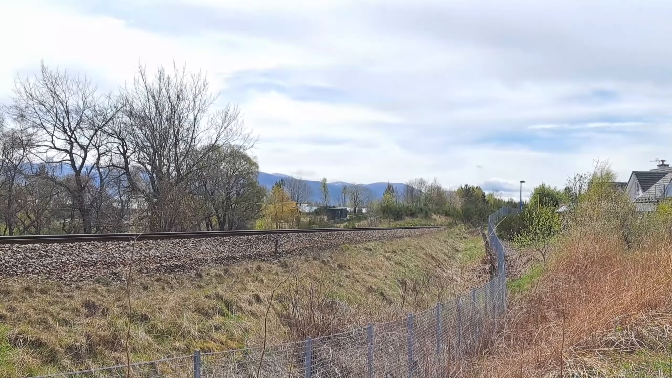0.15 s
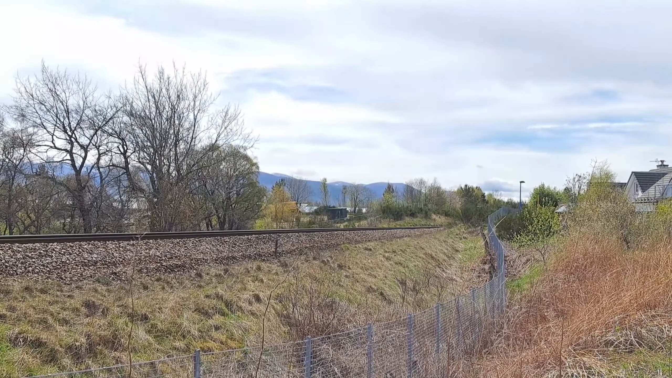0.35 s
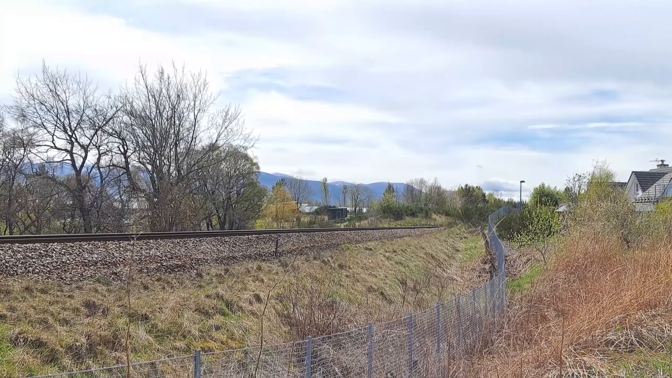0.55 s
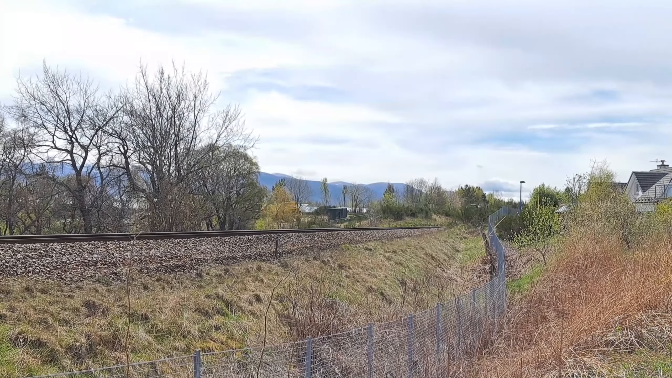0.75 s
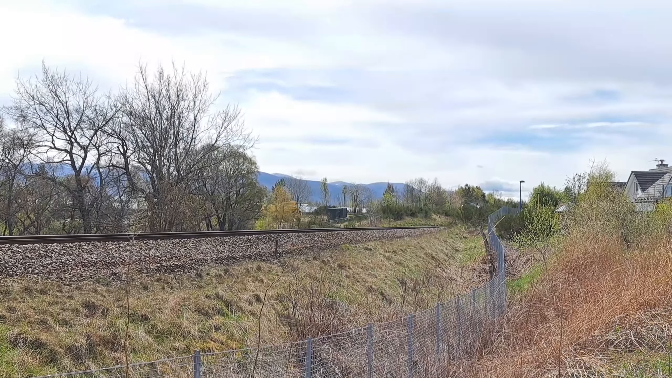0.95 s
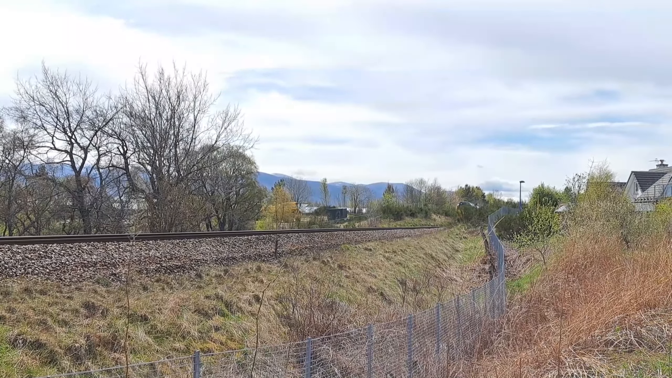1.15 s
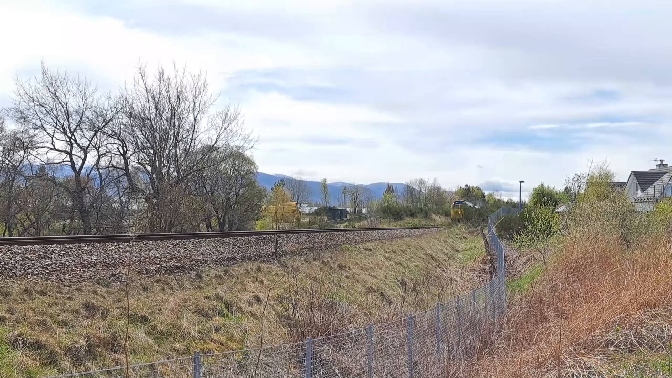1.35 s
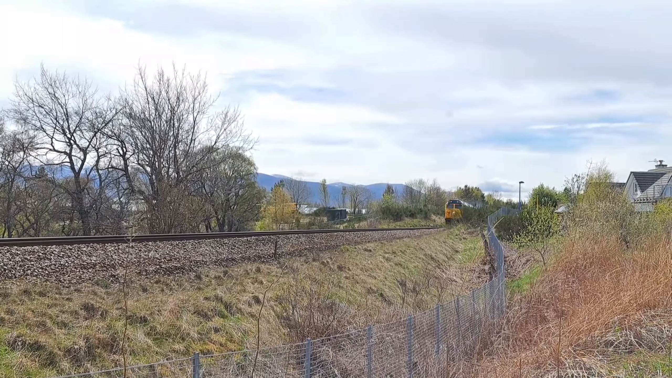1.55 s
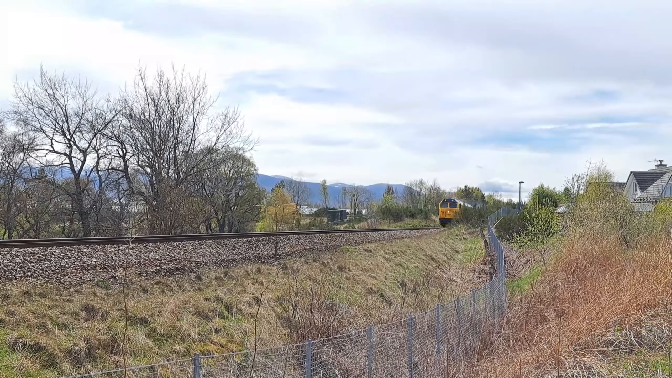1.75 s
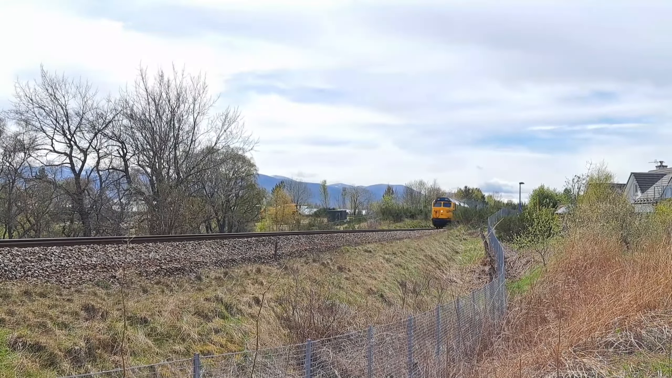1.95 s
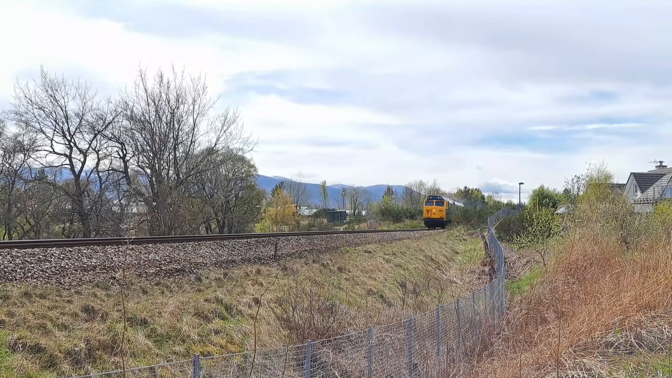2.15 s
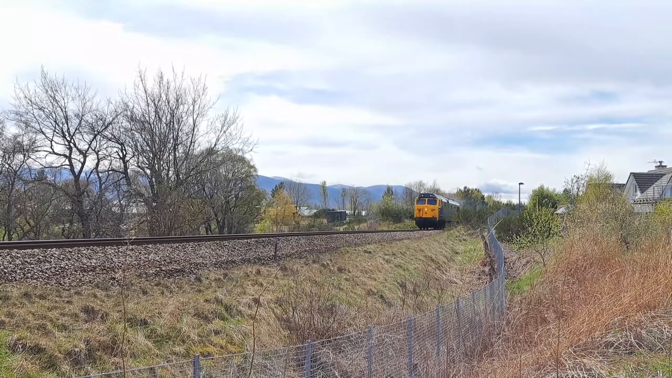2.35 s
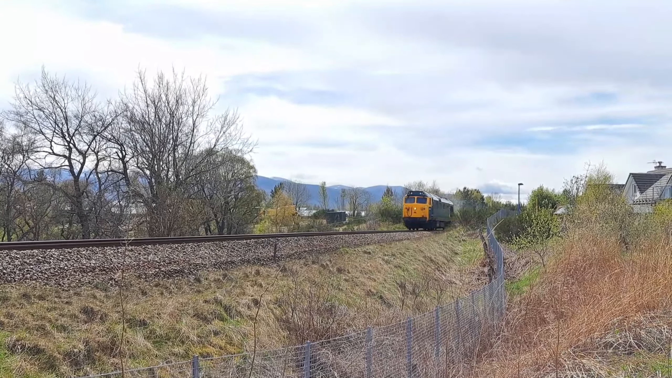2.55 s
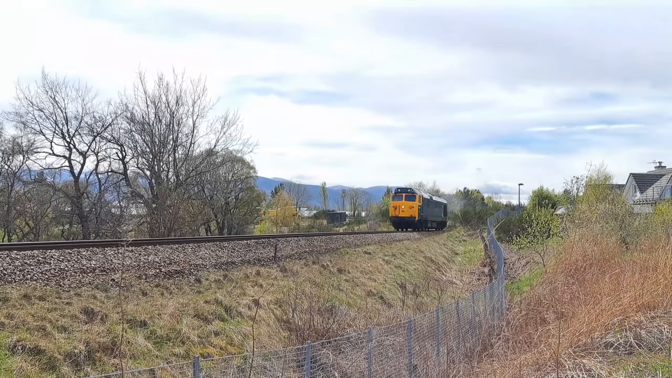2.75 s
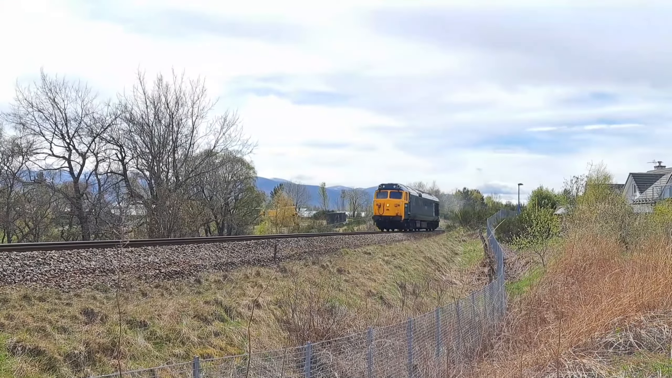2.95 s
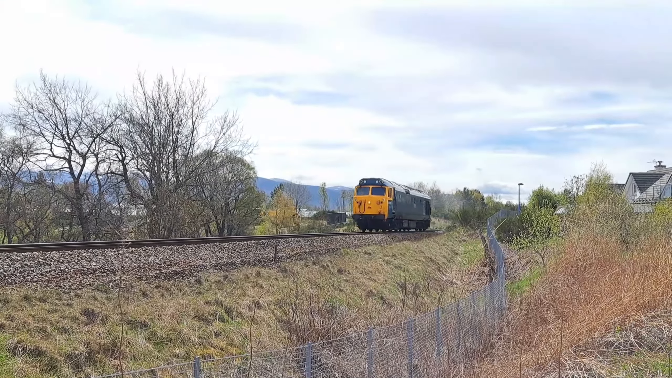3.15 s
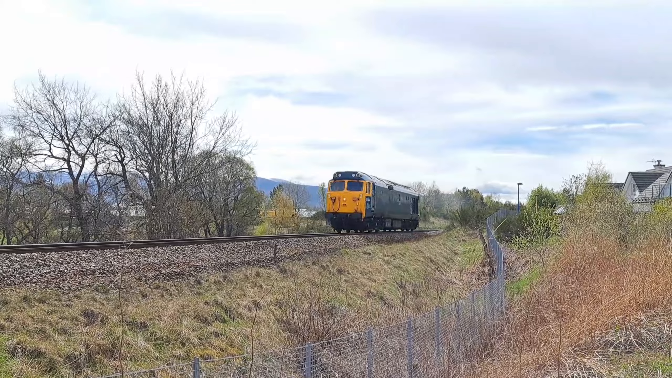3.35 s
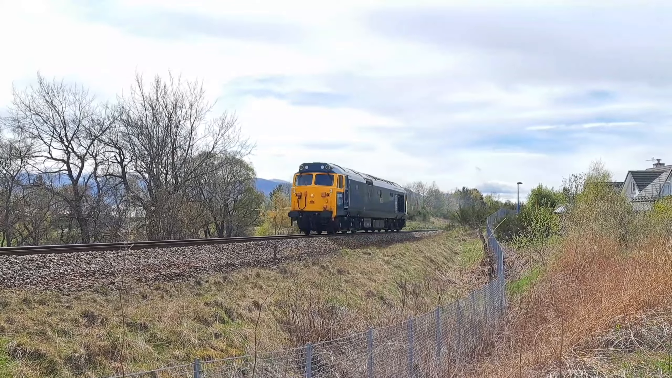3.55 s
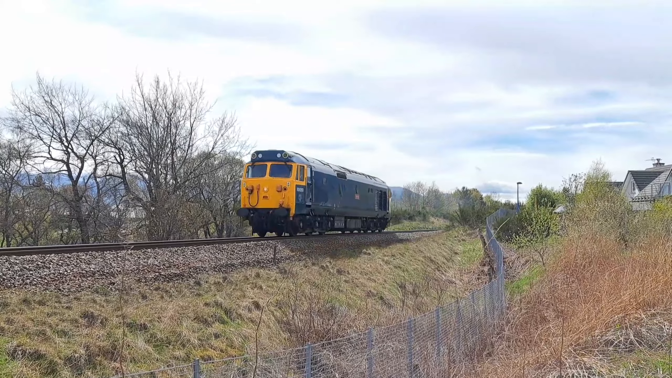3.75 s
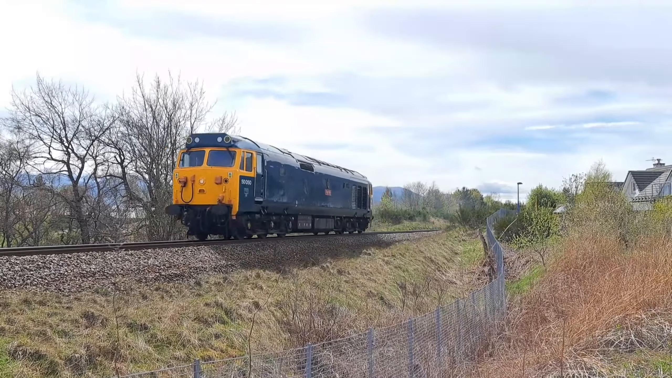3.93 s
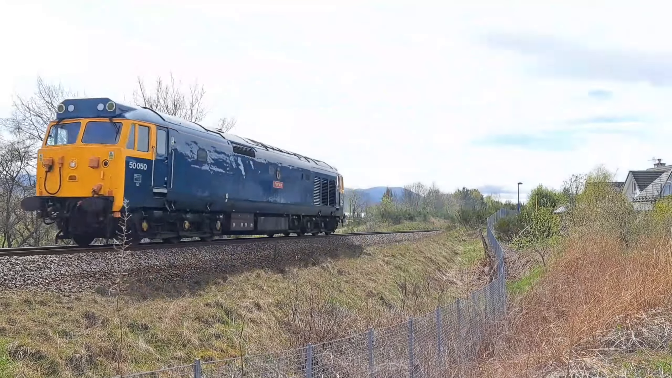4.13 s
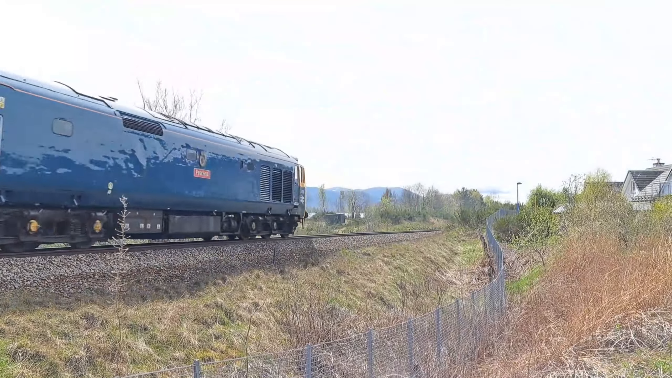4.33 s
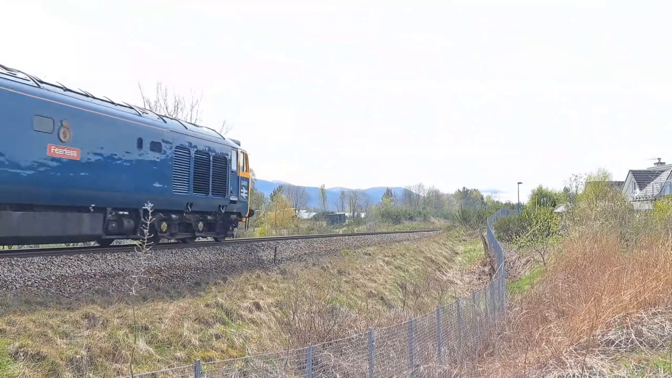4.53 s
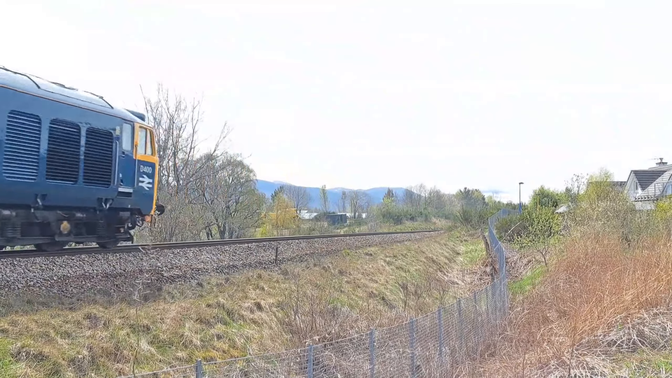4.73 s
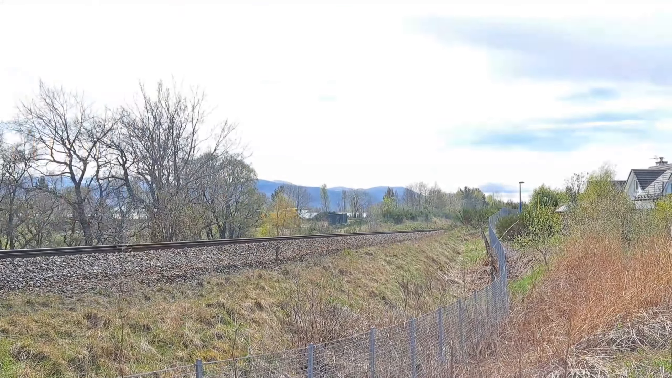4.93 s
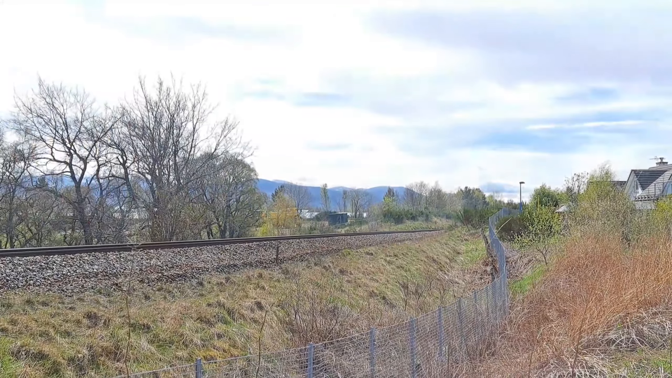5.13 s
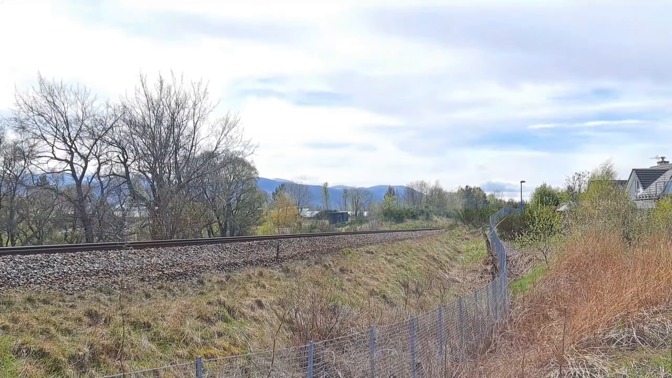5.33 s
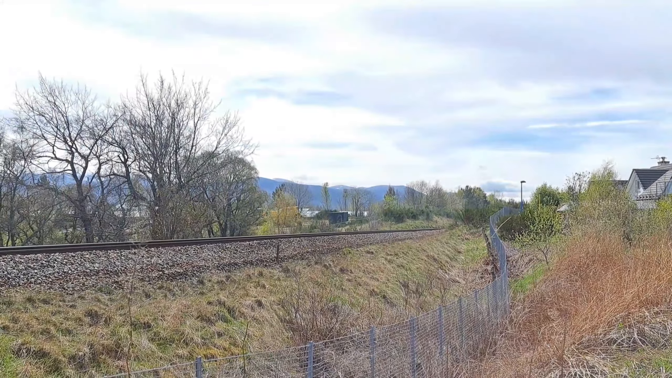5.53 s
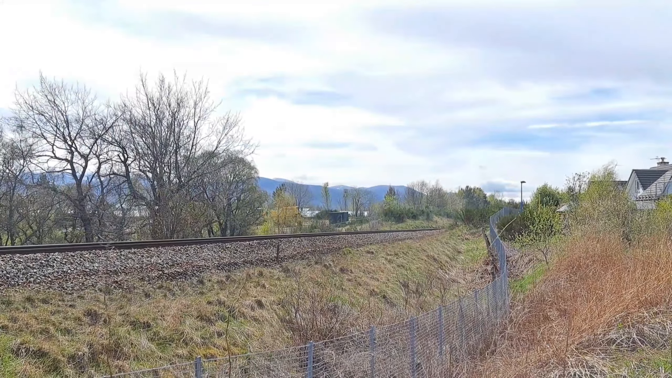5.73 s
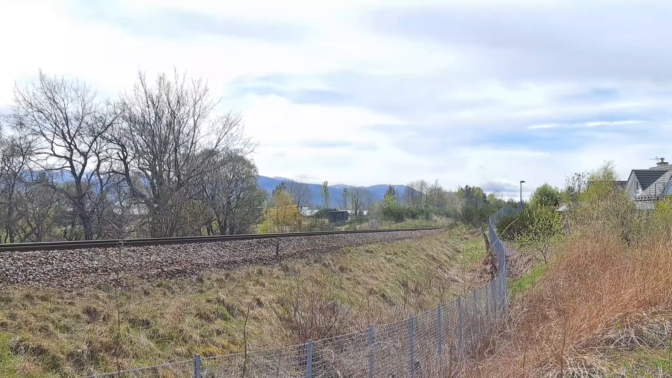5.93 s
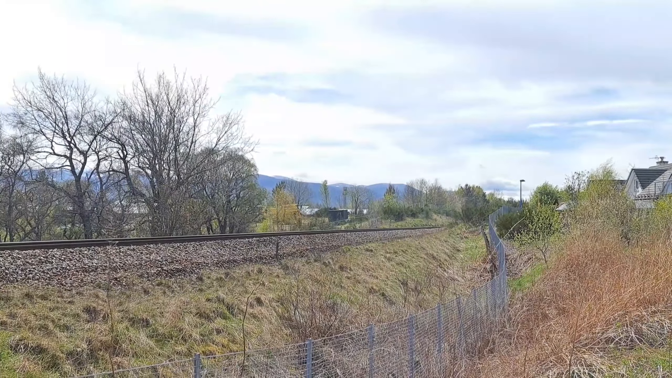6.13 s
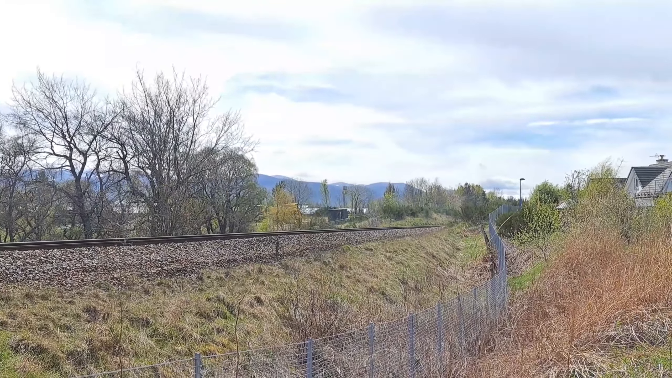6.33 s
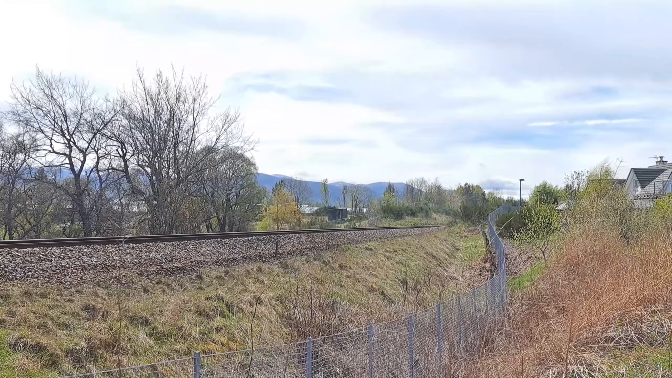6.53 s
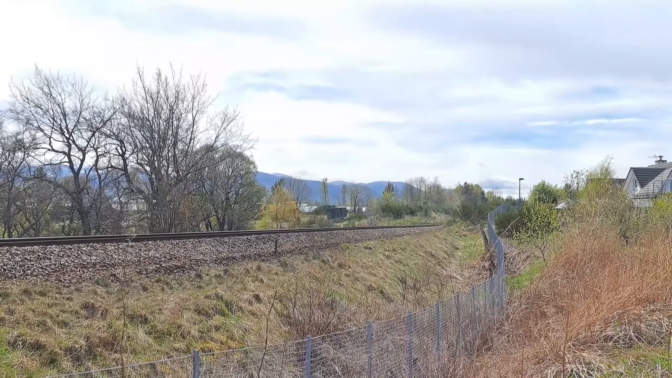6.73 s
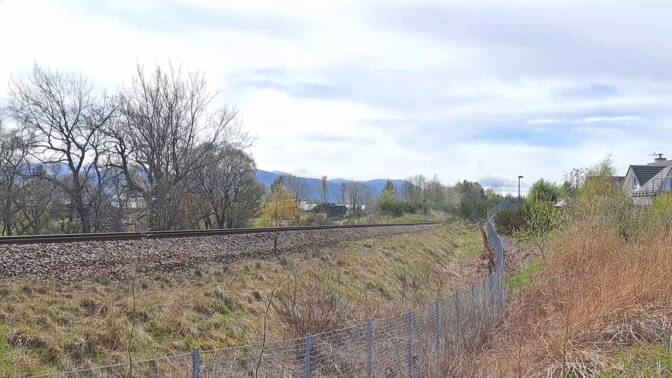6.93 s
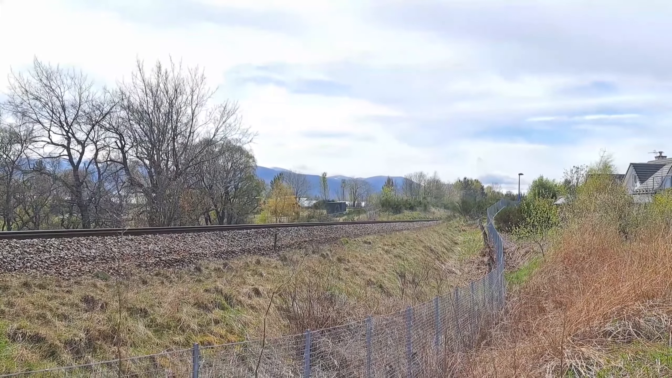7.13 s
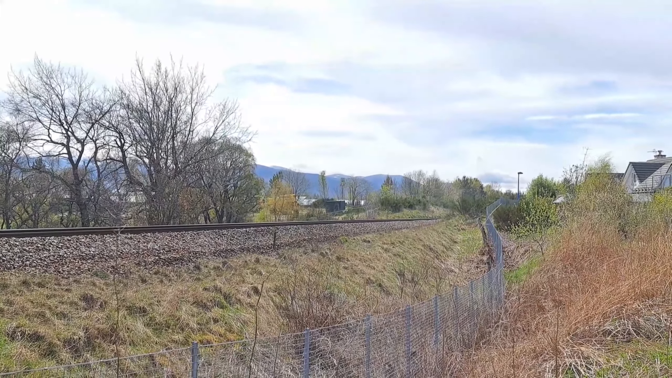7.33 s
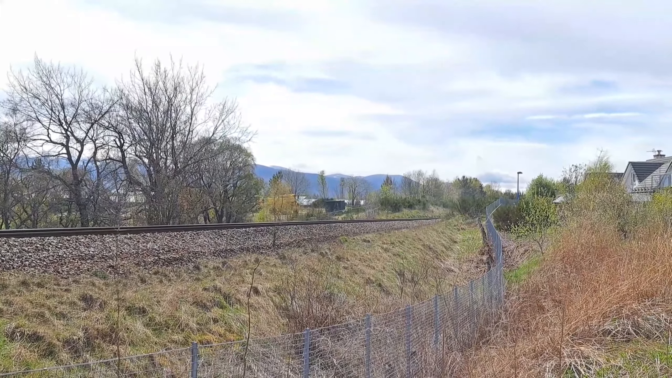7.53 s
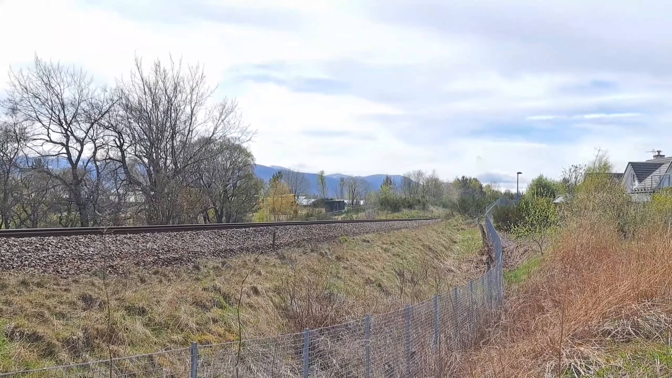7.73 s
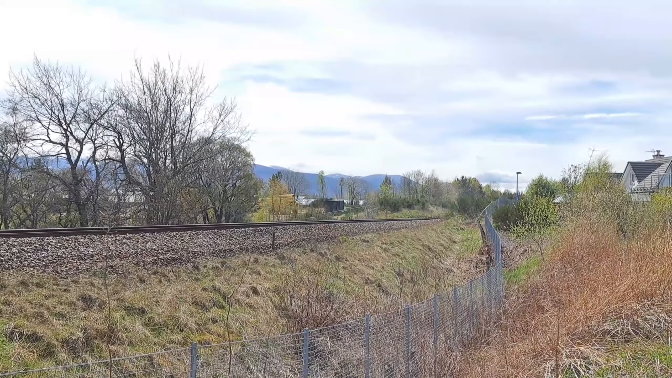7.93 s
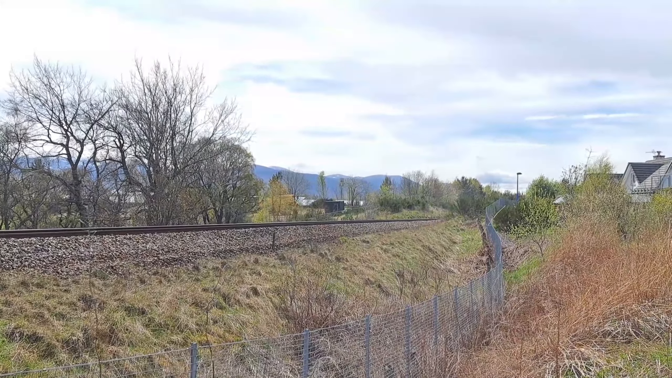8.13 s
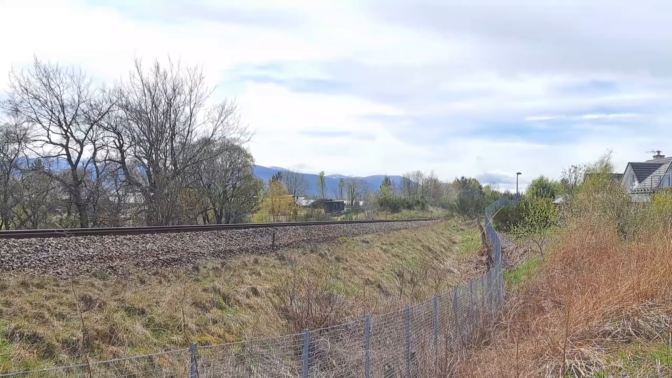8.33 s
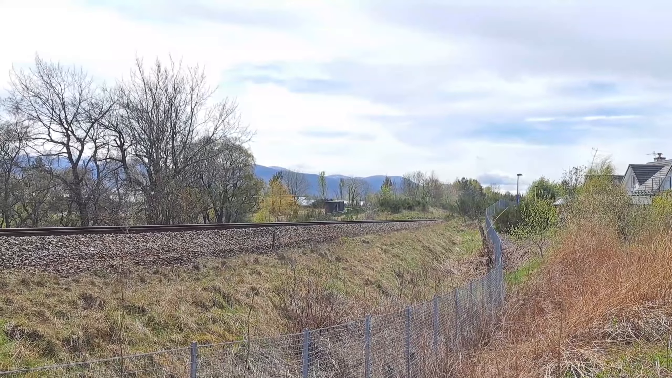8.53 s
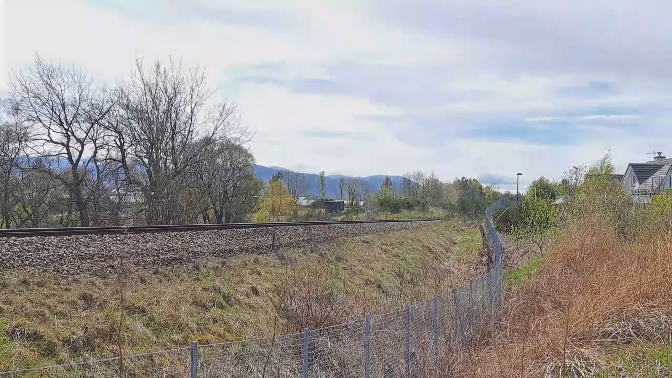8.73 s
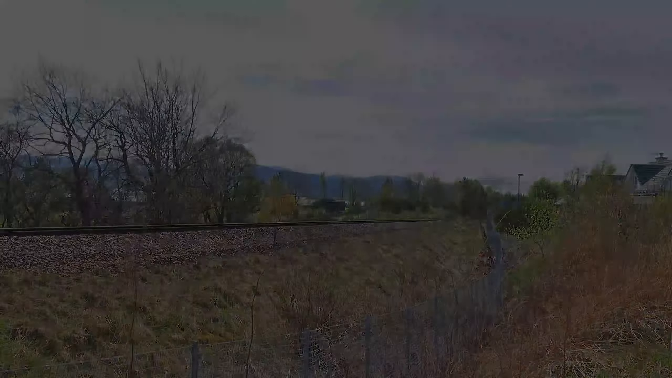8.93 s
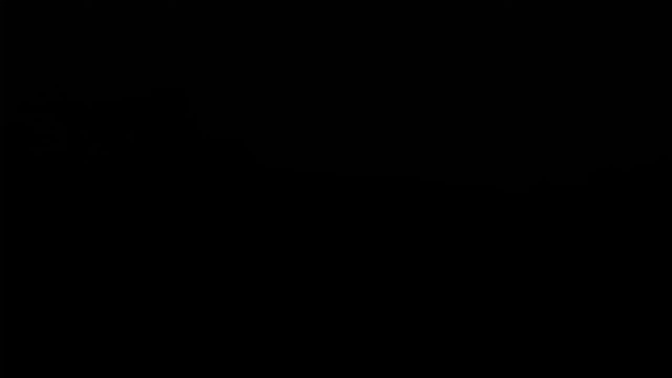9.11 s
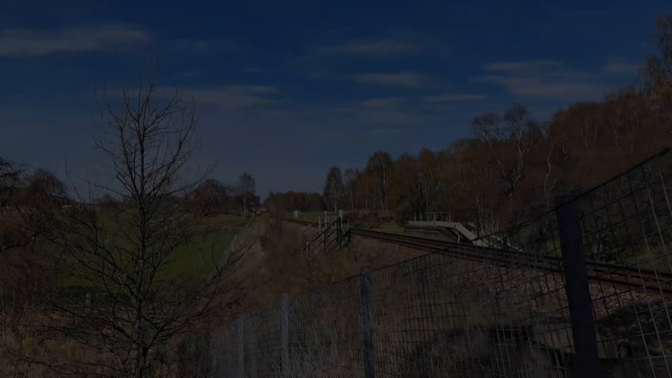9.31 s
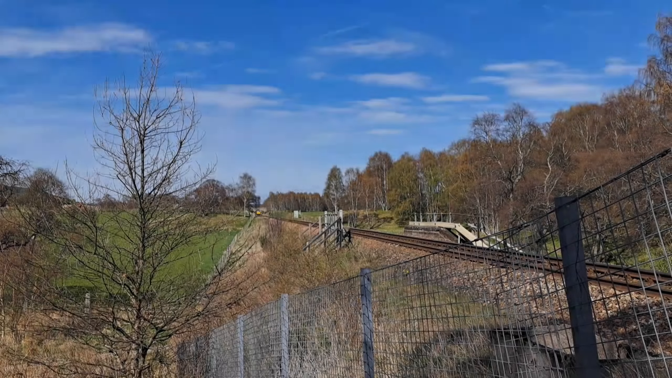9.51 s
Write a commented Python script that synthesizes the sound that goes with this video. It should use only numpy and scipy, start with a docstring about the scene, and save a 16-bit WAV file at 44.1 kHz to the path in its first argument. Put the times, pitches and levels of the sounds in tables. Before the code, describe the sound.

On a rural embankment, the rails sing and a diesel engine throbs as a lone locomotive draws near. It passes from right to left with roaring, droning wheels, metal rattles, thin squeals and a faint high whistle, dropping in pitch. The rails keep ringing as it recedes and gusts thump on the microphone. The sound breaks off briefly, leaving soft wind and a faint bird call.

```python
"""A rural embankment, where a lone diesel locomotive runs past from ahead-right to the left.
Its engine eases off as the exhaust throbs and the turbocharger whistles down in pitch. Rough wheels
roar, drone and squeal, loose gear rattles, and the rails sing before and after it passes.
Gusts thump on the microphone. The sound breaks off for a moment, and a quiet lineside follows,
with wind and a small bird."""
import sys
import numpy as np
from scipy import signal
from scipy.fft import rfft, irfft
from scipy.io import wavfile
from scipy.ndimage import uniform_filter1d, map_coordinates

SR = 44100
rng = np.random.default_rng(int(sys.argv[2]) if len(sys.argv) > 2 else 0)


def wav_out(sig):
    """Save sig, one row per channel (or a flat mono array), as 16-bit PCM at SR to the path in sys.argv[1]."""
    wavfile.write(sys.argv[1], SR, np.round(np.clip(np.atleast_2d(sig).T, -1, 1) * 32767).astype(np.int16))


N = 422017
T = np.arange(N) / SR
HZ = np.maximum(np.arange(2 ** 18 + 1) * SR / 2 ** 19, 1)  # the frequencies that filters work on

SPEED_M_S, SOUND_M_S = 36, 343
CLOSEST_S = 4.64  # the middle of the locomotive passes the listener
TRACK_M, BODY_M = 15, 17.1  # distance to the track; spread of the sources along the body
BREAK_S, RESUME_S = 9.118, 9.355  # silence lies between these

# How often the four-stroke engine is heard to repeat its cycle: (time [s], rate [Hz])
CYCLE_RATE = [(0, 6.27), (1, 5.93), (2, 5.55), (3, 5.33), (4.55, 5.17), (5.3, 4.56), (6, 4.48), (9.1, 4.45)]
# Tones of sixteen unequal cylinders: (multiple of the cycle rate, front level [dB], rear level [dB])
ENGINE_TONES = [(5, -10.5, -23.5), (6, -27.5, -31), (7, -5.5, -20.5), (8, -8.5, -17.5), (9, -3, -12),
                (10, -12, -19.5), (11, -11.5, -3.5), (12, -15, -16), (13, -11, -8), (14, -11, -13.5),
                (16, -8, -7), (17, -15, -16), (20, -20, -5.5), (25, -26, -11.5), (27, -22, -8.5),
                (30, -22.5, -9.5), (33, -23, -10)]
# Tone colour of the exhaust gas: (frequency [Hz], level [dB])
EXHAUST_COLOUR = [(25, -43), (42, -2), (62, 3), (90, -8), (125, 1), (160, -0.5), (195, -6.5), (290, -6.5),
                  (380, -12), (500, -12), (900, -33.5), (2500, -63.5)]
# Tone colours of the wheels' roar, ring and hiss: (frequency [Hz], level [dB])
ROAR_COLOUR = [(150, -29.5), (400, -16), (520, -3.5), (680, 2), (770, -1), (860, -3), (980, -9.5),
               (1300, -11.5), (2000, -23), (5000, -69)]
RING_COLOUR = [(600, -12), (1100, 3.5), (1300, 2), (1500, -0.5), (1800, 2.5), (2100, 0), (2600, -2),
               (3200, -5), (4000, -8.5), (5000, -14), (8000, -65)]
HISS_COLOUR = [(2000, -10), (3500, 5), (4600, 4), (5600, 1), (7000, -8), (8000, -14), (10000, -14.5),
               (12500, -14), (15500, -31.5)]
# Notes of wheel and rail that sing out of the roar: (pitch [Hz], half width [Hz], level [dB])
ROAR_NOTES = [(758, 13, -4.5), (822, 8.7, -0.5), (870, 11, -6.5)]
# How each source grows and fades: (place behind the middle [m], level when closest [dB],
# loss at ten times the distance [dB], change from behind [dB], travel until half that change [m])
THROB_PASSING = (-5.5, -24, 8, -3, 17)
GAS_PASSING = (-1.5, -17, 27.5, -10.5, 32)
ROAR_PASSING = (-3, -18, 21.5, -10, -8)
RING_PASSING = (4.5, -24.5, 22.5, -14.5, 39)
HISS_PASSING = (0.5, -32, 35, -9.5, 52)
# Slow swells, as with shifting wind and uneven track; gas, roar and hiss follow them only in part:
# (time [s], engine throb [dB], wheel ring [dB], rail song [dB])
SLOW_SWELLS = [(0, -0.5, .5, 2), (.6, 0, -1, 2.5), (1.4, -3, -2, 4.5), (2.3, -1.5, -2, 4),
               (2.9, -0.5, 3, 6.5), (3.35, -2, 2.5, 0.5), (3.8, -1, 0.5, 6), (4.45, -1.5, -0.5, 5.5),
               (5.3, 2.5, .5, 8.5), (5.65, 0.5, 1, 1.5), (5.85, -4, -0.5, 3.5), (6.35, -4, 0, 0.5),
               (6.8, 3, 6.5, 4.5), (7.05, 1, 12, 12.5), (7.45, 5.5, 12, 12.5), (7.65, 2.5, 12.5, 13),
               (7.85, 1.5, 12.5, 13), (8.25, 4, 5.5, 5), (8.5, -9, -2.5, 3.5), (8.8, -14, 1, 11),
               (9.1, 0, 3.5, 7)]
# Drone of out-of-round wheels: (time [s], lower note [dB], upper note [dB])
DRONE_LEVELS = [(0, -34, -40), (1.2, -30, -39), (2.2, -28.5, -34), (2.75, -29.5, -26.5), (3.1, -30, -27.5),
                (3.35, -23.5, -32), (3.6, -22.5, -29.5), (3.85, -33.5, -27.5), (4.05, -20, -24.5),
                (4.45, -19.5, -21), (4.72, -27, -22), (4.9, -23.5, -23.5), (5.15, -29, -27.5),
                (5.4, -38, -36), (5.62, -31, -26), (5.85, -44, -49.5), (9.1, -55, -55)]
# Thuds of the wheel sets on the track: (time [s], half length [s], pitch [Hz], level [dB])
TRACK_THUDS = [(4.4, 0.017, 80, -17), (4.467, 0.02, 54, -12), (4.755, 0.027, 124, -18.5),
               (4.785, 0.033, 164, -20)]
# Notes of the rails ahead of the train and behind it: (pitch [Hz], half width [Hz], level [dB])
RAIL_NOTES_AHEAD = [(750, 61, 2), (1145, 85, 1), (1443, 20, 3), (1985, 77, -6.5), (2690, 24, -15),
                    (3380, 18, -14.5), (4020, 18, -13.5), (4080, 240, -12.5), (5450, 90, -25.5)]
RAIL_NOTES_BEHIND = [(750, 93, 9.5), (1027, 160, 6), (1390, 57, 3), (1530, 29, 8.5), (1922, 30, -2),
                     (2090, 70, -9.5), (3000, 23, -14), (3400, 20, -10.5), (3917, 50, -10)]
# Tone colour of the rails' high sizzle: (frequency [Hz], level [dB])
SIZZLE_COLOUR = [(3500, -17.5), (4600, -1.5), (6000, -25), (7000, -16.5), (8500, -16.5), (10300, -17.5),
                 (11200, -4), (12600, -5.5), (13400, -4.5), (14300, -11.5), (15700, -11)]
# Rise and fall of that sizzle: (time [s], level [dB])
SIZZLE_LEVELS = [(0, 0), (.5, -2), (.9, 2), (1.35, 4), (2.3, 6), (2.9, 8), (3.5, 3.5), (4.3, -1), (5.3, 3),
                 (6.35, -3), (6.8, 5), (7.05, 14), (7.25, 10), (7.45, 14.5), (7.62, 12.5), (7.75, 5),
                 (8.25, 5.5), (8.65, 10.5), (9.1, 9.5)]
# Turbocharger whistle, heard while the engine's side faces the listener: (time [s], level [dB])
WHISTLE_LEVELS = [(3.7, -94), (3.95, -54.5), (4.4, -49), (4.75, -48), (5.15, -48), (5.55, -61),
                  (6.1, -65.5), (6.5, -88)]
# Knocks of the running gear: (time [s], strength [dB], energy fade time [s], ring pitch [Hz])
KNOCKS = [(2.257, -42, 0.0051, 5450), (2.302, -43, .006, 5800), (4.233, -34.5, .005, 4700),
          (4.308, -29.5, .005, 6000), (4.375, -28, .006, 5960), (4.497, -28, .008, 6000),
          (4.545, -29, .006, 5900), (4.74, -24, 0.0065, 5800), (4.812, -36, .006, 5600),
          (4.845, -23.5, .006, 6000), (4.897, -36, .005, 3310), (4.967, -24.5, .005, 6050),
          (5.068, -25.5, .007, 6080), (5.157, -23, .007, 5800), (5.275, -29.5, .006, 5740),
          (5.372, -27, .008, 4970), (5.401, -31.5, .009, 5500), (5.451, -27, 0.0042, 5100),
          (5.476, -36, 0.0071, 6000), (5.542, -35, .008, 5500), (5.595, -35, 0.0093, 5700),
          (5.637, -36, .014, 5450), (5.713, -40, .01, 4800), (5.772, -37, .01, 5400),
          (5.845, -44, .008, 6400), (5.917, -36.5, .008, 4700), (5.995, -47, 0.0068, 5900),
          (6.15, -50, .006, 5600), (6.22, -51, .006, 5600), (8.997, -52, .003, 7000)]
# Wheel rims brushing the rail, and, in the last two rows, the rails ringing long after the train # has gone by:
# (time [s], half length [s], pitch [Hz], half width [Hz], level [dB])
SQUEALS = [(3.25, 0.053, 5990, 18, -51), (3.3, .055, 5190, 28, -43.5), (3.31, .07, 4600, 24, -42.5),
           (3.33, 0.093, 4750, 650, -44.5), (3.35, .1, 3460, 25, -47), (3.47, .09, 4570, 30, -47.5),
           (3.48, .08, 5210, 45, -52), (3.5, .5, 2530, 24, -53.5), (4.43, .12, 868, 20, -32),
           (4.5, 0.074, 768, 20, -30.5), (4.53, 0.11, 2645, 65, -38), (4.8, .3, 3920, 90, -43.5),
           (4.95, .2, 3370, 67, -34.5), (4.95, 0.24, 3160, 70, -38), (4.95, 0.23, 488, 16, -34.5),
           (5.2, 0.088, 2605, 51, -42.5), (5.922, .008, 2250, 100, -41), (8.004, 0.05, 2630, 110, -54.5),
           (8.245, 0.035, 2580, 130, -58)]
# Gusts on the microphone: (time [s], half length [s], left strength [dB], right strength [dB])
WIND_GUSTS = [(0.107, 0.051, -25, -44), (0.366, 0.12, -26, -32), (5.83, 0.055, -21.5, -44),
              (6.018, 0.043, -21, -41), (7.279, 0.043, -23.5, -44), (7.43, .043, -19.5, -34),
              (8.078, 0.067, -10.5, -17), (8.137, .003, -12, -14.5), (8.225, 0.018, -12.5, -38),
              (8.811, 0.067, -24.5, -21.5), (9.087, 0.022, -30, -29), (9.412, 0.0017, -28, -26),
              (9.437, 0.034, -35.5, -28.5), (9.507, 0.023, -28, -24.5)]
# Tone colours of slow and fast swirls of wind, and of country air: (frequency [Hz], level [dB])
SLOW_SWIRL_COLOUR = [(20, -29.5), (35, -2), (60, 0.5), (130, 2.5), (230, -7.5), (390, -18), (700, -42.5),
                     (1300, -54.5), (3000, -82)]
FAST_SWIRL_COLOUR = [(60, -23.5), (150, -2.5), (250, 1), (400, -5.5), (560, -15), (750, -25), (1300, -39),
                     (3000, -82)]
AIR_COLOUR = [(30, -6), (60, 11), (300, 5.5), (800, -5.5), (1500, -17), (2800, -26.5), (4000, -36.5),
              (9000, -51.5)]
# A small bird's call: (time [s], pitch [Hz], level [dB])
BIRD_CALL = [(9.355, 4450, -69), (9.548, 4460, -71.5), (9.553, 3620, -68), (9.57, 4520, -53)]
# Ringing of the right microphone's opening: (frequency [Hz], gain [dB])
RIGHT_MIC_COLOUR = [(500, 0), (700, -0.5), (850, 7), (1080, 0), (1900, 8), (2350, 11.5), (2630, 15.5),
                    (2900, 11.5), (3300, 6), (4400, 0.5), (5900, 11.5), (7000, 9), (8400, -5.5), (10000, 0),
                    (12500, 1.5), (15500, -8)]


def engine(throb_db, gas_db):
    """Unequal cylinders make a stack of low tones that surges once a cycle; each firing puffs gas."""
    cycle_hz, = curves(CYCLE_RATE)
    turn = 2 * np.pi * (np.cumsum(cycle_hz) / SR - .11)  # the surge comes .11 of the way into a cycle
    rear = behind()
    throb = 0
    for multiple, front_db, rear_db in ENGINE_TONES:
        k = round(multiple)
        boom_db = 2.5 / (1 + ((k * cycle_hz - 46) / 6) ** 2)  # the silencer booms near 46 Hz
        db = front_db + (rear_db - front_db) * rear + boom_db + (1.5 + 1.8 * rear) * walk(4)
        # the silencer spreads the tones in time, and moving air lets each one drift
        drift = np.pi * (k - 8) ** 2 / 11 + .3 * walk(2)
        throb = throb + undb(db) * np.sin(k * turn + drift)
    puffs = 1 + (0.29 + 0.22 * rear) * np.cos(16 * turn)  # sixteen firings a cycle
    gas = placed(noise(shape(EXHAUST_COLOUR)), likeness=0.93) * puffs * undb(1.26 * walk(22))
    gas = filtered(gas, shape([(18, -24), (38, 0)]))  # the puffs carry no deep bass
    left_right_db = np.array([[-1.1], [0]])
    return unit(throb) * undb(throb_db + left_right_db) + gas * undb(gas_db)


def wheels(roar_db, ring_db, hiss_db):
    """Rough wheels shake the track, ring like steel discs and make the running gear hiss in flurries."""
    judder = walk(45)
    roar = noise(shape(ROAR_COLOUR) * (1 + resonances(ROAR_NOTES)))
    roar = placed(moving(roar), likeness=0.56) * undb(roar_db + 0.47 * walk(13) + 0.44 * judder)
    ring = steel_noise(RING_COLOUR, depth_db=2.0)
    ring = placed(moving(ring), likeness=0.49) * undb(ring_db + .5 * walk(14) + 0.47 * judder)
    hiss = steel_noise(HISS_COLOUR, depth_db=0.9)
    hiss = placed(hiss, likeness=0.16) * undb(hiss_db + 0.69 * walk(30) + 0.6 * judder)
    sizzle = noise(shape([(5000, -17.5), (8000, -9), (12500, -10.5), (15500, -16.5)]))
    close_by = swell(4.9, 0.33)  # farther off, air swallows the finest sizzle
    return roar + ring + hiss + sizzle * close_by * undb(-42 + 2.6 * walk(76))


def wheel_drone(approach_turn_hz=11.7):
    """Slightly out-of-round wheels pound the track in two low notes that beat against the engine."""
    turn = phase(approach_turn_hz * doppler(back_m=16))
    return sum(np.sqrt(2) * undb(db + .6 * walk(4)) * np.sin(multiple * turn + .2 * walk(2))
               for multiple, db in zip((4, 5), curves(DRONE_LEVELS)))


def thuds():
    """The weight on the wheel sets makes the track boom briefly."""
    angles = rng.uniform(0, 2 * np.pi, len(TRACK_THUDS))
    return sum(np.sqrt(2) * undb(db) * swell(s, half_s) * np.sin(2 * np.pi * hz * (T - s) + angle)
               for (s, half_s, hz, db), angle in zip(TRACK_THUDS, angles))


def rails(swell_db, loss_db_per_m=0.08):
    """The rails ring with the wheels' sound and carry it far along the line, both ways."""
    rear = behind()
    song = np.sqrt(1 - rear) * noise(resonances(RAIL_NOTES_AHEAD))
    song += np.sqrt(rear) * noise(resonances(RAIL_NOTES_BEHIND))
    sizzle_db, = curves(SIZZLE_LEVELS)
    sizzle = noise(shape(SIZZLE_COLOUR)) * undb(-22.5 + sizzle_db + walk(25))
    song *= undb(swell_db + 1.3 * walk(9))
    db = -35.2 - loss_db_per_m * np.abs(metres_past()) - 3.5 * rear
    return placed(song + sizzle, likeness=0.76, lags_ms=(.29, 0.497)) * undb(db)


def turbocharger(base_hz=9950, sag_hz_per_s=79):
    """An airy whistle that sinks as the turbocharger slows, and drops further as it goes by."""
    hz = (base_hz - sag_hz_per_s * (T - CLOSEST_S)) * doppler(back_m=7.6)
    wobble = noise(shape([(110, 0), (300, -4), (650, -16), (1300, -45)]))
    db, = curves(WHISTLE_LEVELS)
    flutter_db = 2.6 * walk(34) - .5
    return wobble * np.sqrt(2) * np.sin(phase(hz)) * undb(db + flutter_db)


def rattles(rise_s=.001, lead_s=.0035, ticks_per_s=50):
    """Steel knocks on steel, quick to rise and slower to fade, each knock with its own ring."""
    force, ring = 0, 0
    for s, db, fade_s, hz in KNOCKS:
        age = T - s + lead_s
        decay = np.where(age < 0, -age / rise_s, age / fade_s / 2)
        knock = undb(db) * np.exp(-np.minimum(decay, 20))
        force += knock
        ring += knock * np.sin(2 * np.pi * hz * T)
    ring = ring * noise(shape([(200, 0), (500, -8), (1200, -35)]))
    # loose gear ticks lightly between the loud knocks; each tick fades in about 5 ms
    ticks = (rng.random(N) < ticks_per_s / SR) * rng.uniform(.3, 1, N)
    ticks = signal.lfilter([1], [1, -np.exp(-1 / (.005 * SR))], ticks)
    force += undb(-40.5) * nearness(back_m=14) ** 2 * ticks
    clank = noise(shape([(1200, -15.5), (2200, -9), (3200, -7.5), (5000, -1),
                         (6500, -11.5), (8000, -7.5), (10000, -25)]))
    treble = noise(shape([(5000, -14), (8000, 3.5), (12500, -1), (15500, -17)]))
    close_by = swell(4.9, .45)  # only near knocks keep their highest treble
    body = (clank * force * undb(-1) + ring * undb(-3)) * undb(-6 * close_by)
    return placed(body + treble * force * close_by ** 2 * undb(-13), likeness=0.56)


def squeal():
    """Wheel rims rub the outer rail of the curve and give thin, lingering rings; later the far rails ring
    briefly the same way."""
    rings = sum(noise(resonances([(hz, width, db)])) * swell(s, half_s) * undb(db)
                for s, half_s, hz, width, db in SQUEALS)
    return placed(rings, likeness=0.73) * undb(1.5 * walk(30))


def wind():
    """Swirls of air buffet each side of the microphone; the harder the gust, the faster they come."""
    gusts = sum(undb([[left], [right]]) * swell(s, half_s) for s, half_s, left, right in WIND_GUSTS)
    breeze = undb([[-43], [-44]]) * undb(6 * walk(5))
    force = gusts + breeze
    fast_share = np.clip(force / undb(-9), 0, .9)
    slow = placed(noise(shape(SLOW_SWIRL_COLOUR)), likeness=0.2) * np.sqrt(1 - fast_share ** 2)
    fast = placed(noise(shape(FAST_SWIRL_COLOUR)), likeness=0.22) * fast_share
    return (slow + fast) * force * undb(-1.5 + walk(60))


def bird():
    """A small bird's thin call: a sliding tone roughened by noise."""
    hz, db = curves(BIRD_CALL)
    roughness = noise(shape([(120, 0), (250, -5), (500, -43)]))
    return roughness * np.sin(phase(hz)) * undb(db - 1)


def country_air(db):
    """The soft, low rush of open country."""
    return noise(shape(AIR_COLOUR)) * undb(db)


def steel_noise(colour, depth_db):
    """Wheels and frame ring at many close pitches, which blur into a smooth rush with distance."""
    ripple = rng.standard_normal(400)
    peaks = undb(depth_db * np.interp(HZ, np.linspace(0, 16000, len(ripple)), ripple))
    near = nearness()
    return near * noise(shape(colour) * peaks) + np.sqrt(1 - near ** 2) * noise(shape(colour))


def metres_past(back_m=0):
    """How far a point back_m behind the locomotive's middle has gone past the listener."""
    return SPEED_M_S * (T - CLOSEST_S) - back_m


def behind(back_m=0):
    """Near 0 while that point approaches, near 1 once it has gone by."""
    return (1 + metres_past(back_m) / np.hypot(metres_past(back_m), TRACK_M)) / 2


def nearness(back_m=0):
    """Closest distance over present distance: 1 as that point passes."""
    closest = np.hypot(TRACK_M, BODY_M)
    return closest / np.hypot(metres_past(back_m), closest)


def doppler(back_m=0):
    """Pitch falls as a source goes by (the Doppler effect); 1 is its pitch on the far approach."""
    mach = SPEED_M_S / SOUND_M_S
    return (1 - mach) / (1 + mach * (2 * behind(back_m) - 1))


def passing(source):
    """Level in dB of a source that fades with distance and is weaker from behind."""
    back_m, closest_db, loss_db, rear_db, past_m = source
    return closest_db + loss_db * np.log10(nearness(back_m)) + rear_db * behind(past_m)


def moving(pair, closest_echo_ms=3.8, closest_echo_gain=0.16):
    """Passing lowers the pitch, and a short echo off the bank adds a sweeping, hollow colour."""
    position = np.minimum(np.cumsum(doppler()), N - 1)
    near = nearness() ** 2
    echo_position = position - closest_echo_ms * near * SR / 1000
    direct = np.array([map_coordinates(x, [position], order=3) for x in pair])
    echo = np.array([map_coordinates(x, [echo_position], order=1) for x in pair])
    return unit(direct - closest_echo_gain * near * echo)


def placed(pair, likeness, lags_ms=(-0.061, 0.476)):
    """Sound reaches the right side later as the train moves left; bank and trees scatter the rest."""
    direct, scattered = pair
    lag_ms = np.interp(behind(back_m=-10.6), [0, 1], lags_ms)  # follows the locomotive's nose
    late = map_coordinates(direct, [(T - lag_ms / 1000) * SR], order=3, mode="nearest")
    return np.array([direct, likeness * late + np.sqrt(1 - likeness ** 2) * scattered])


def undb(db):
    """Turn decibels into a gain."""
    return 10 ** (np.asarray(db) / 20)


def unit(x):
    """Scale a sound to an average power of 1."""
    return x / np.sqrt(np.mean(x ** 2))


def phase(hz):
    """The running angle of a tone whose pitch changes."""
    return 2 * np.pi * np.cumsum(hz) / SR


def curves(rows):
    """Each column of a table, joined by straight lines in time."""
    times, *columns = np.transpose(rows)
    return [np.interp(T, times, column) for column in columns]


def swell(peak_s, half_s):
    """A bell-shaped rise and fall."""
    return np.exp(-np.minimum(((T - peak_s) / half_s) ** 2, 100) / 2)


def walk(steps_per_s):
    """Smooth random wandering with a spread near 1."""
    steps = rng.standard_normal(4096)
    path = np.interp(T * steps_per_s, np.arange(len(steps)), steps)
    return 1.3 * uniform_filter1d(path, int(SR / steps_per_s / 2))


def shape(colour):
    """Gain at every frequency from (frequency [Hz], level [dB]) points."""
    hz, db = np.transpose(colour)
    return undb(np.interp(np.log(HZ), np.log(hz), db))


def resonances(notes):
    """Gain at every frequency, with a peak for each ringing note."""
    return sum(undb(db) / (1 + ((HZ - hz) / width) ** 2) for hz, width, db in notes)


def filtered(x, gain):
    """Turn each frequency of a sound up or down by its gain."""
    return irfft(rfft(x, 2 * len(HZ) - 2) * gain)[..., :N]


def noise(gain):
    """Two unrelated noises of one colour, with an average power of 1."""
    return unit(filtered(rng.standard_normal((2, N)), gain))


def scene():
    """The locomotive and the wind, a short silence, then the quiet lineside."""
    engine_db, wheels_db, rails_db = curves(SLOW_SWELLS)
    motor = engine(throb_db=passing(THROB_PASSING) + engine_db,
                   gas_db=passing(GAS_PASSING) + 0.27 * engine_db)
    rolling = wheels(roar_db=passing(ROAR_PASSING) + 0.45 * wheels_db,
                     ring_db=passing(RING_PASSING) + wheels_db,
                     hiss_db=passing(HISS_PASSING) + 0.83 * wheels_db)
    train = motor + rolling + wheel_drone() + thuds() + rails(rails_db)
    train += turbocharger() + rattles() + squeal()
    before = np.clip((BREAK_S - T) / 0.013, 0, 1)
    after = np.clip((T - RESUME_S) / 0.023, 0, 1)
    air_fade_in = np.clip((T - RESUME_S) / 0.18, 0, 1) ** 2
    pass_by = train + country_air(db=-47.5)
    gusts = wind()
    lineside = bird() + country_air(db=-46.5) * air_fade_in
    return pass_by * before + gusts * (before + after) + lineside * after


def record(dry, ceiling=.95, top_hz=15750):
    """The right microphone rings like a small hollow; peaks are rounded and the top treble is cut."""
    # a minimum-phase filter: the ringing follows each sound and never comes before it
    cepstrum = irfft(np.log(shape(RIGHT_MIC_COLOUR)))
    cepstrum[1:len(HZ) - 1] *= 2
    cepstrum[len(HZ):] = 0
    pair = np.array([dry[0], filtered(dry[1], np.exp(rfft(cepstrum)))])
    rounded = pair / (1 + (pair / ceiling) ** 6) ** (1 / 6)
    return signal.sosfilt(signal.ellip(10, .2, 80, top_hz, fs=SR, output="sos"), rounded)


dry = scene()
out = record(dry)
wav_out(out)
```